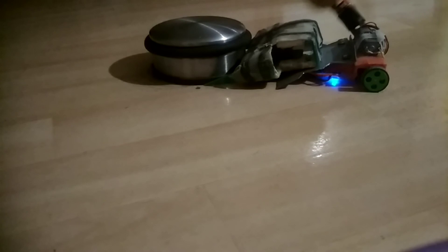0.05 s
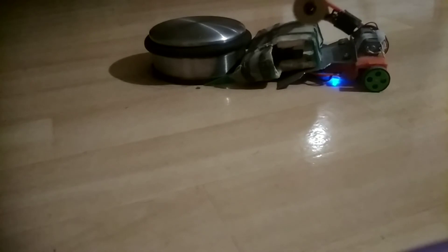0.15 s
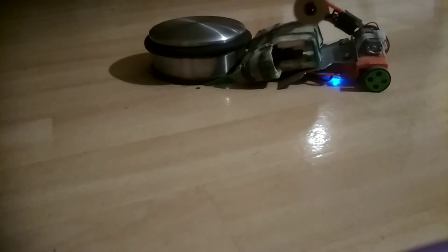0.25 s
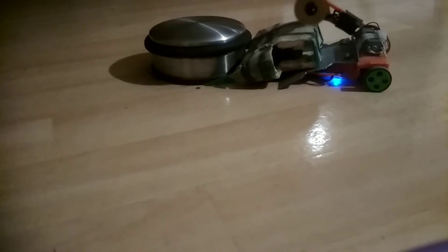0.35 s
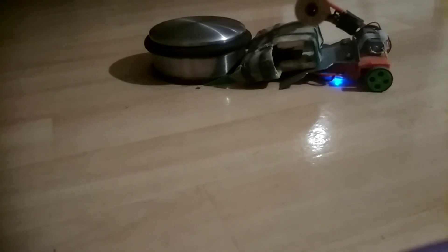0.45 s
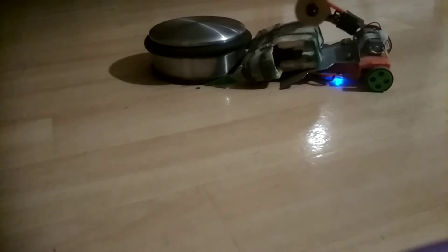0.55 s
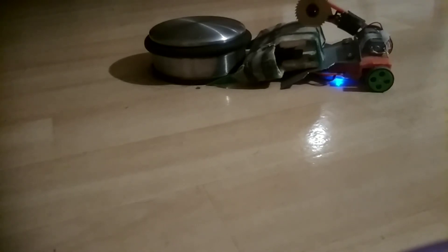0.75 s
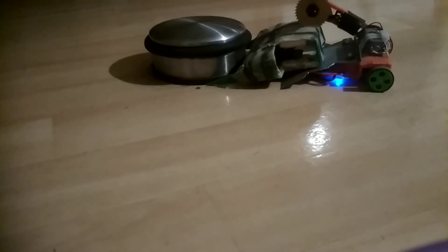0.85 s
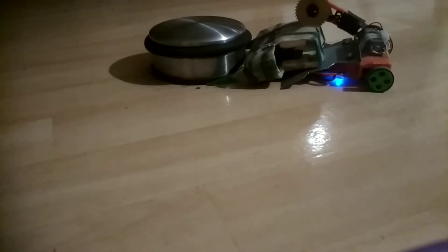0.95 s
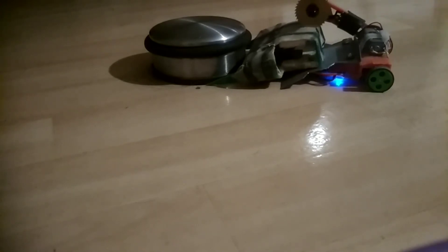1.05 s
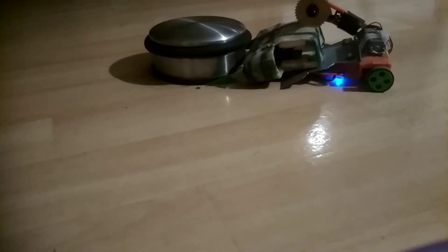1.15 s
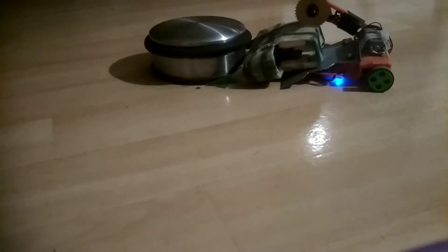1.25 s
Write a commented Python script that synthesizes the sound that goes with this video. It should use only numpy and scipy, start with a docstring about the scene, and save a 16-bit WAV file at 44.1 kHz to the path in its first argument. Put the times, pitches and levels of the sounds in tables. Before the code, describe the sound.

In a small room, a toy robot's saw rasps and bounces after a short gear whir and a sharp crack. Plastic knocks and floor thumps crowd together, the blade squeals and rings out, and a low hum and light ticks remain.

```python
"""On a wooden floor in a small room, a toy robot swings its little circular saw down.
The geared arm motor whirs, then the blade bites with a snap. Its edge rasps and bounces, knocking the
plastic chassis and thumping the floor; the knocks crowd together, then the disc binds, squeals,
rings and runs out. A low hum and a few light ticks remain until the arm motor stirs again."""
import sys
import numpy as np
from scipy import signal
from scipy.fft import rfft, irfft
from scipy.io import wavfile
from scipy.ndimage import uniform_filter1d

SR = 44100
rng = np.random.default_rng(int(sys.argv[2]) if len(sys.argv) > 2 else 0)


def wrap_up_sound(samples):
    """Save the sound to the file named by the first command line argument, as 16-bit audio."""
    columns = np.atleast_2d(samples).T
    # keep every value between -1 and 1, then stretch to whole-number steps
    tamed = np.clip(columns, -1, 1)
    steps = np.round(tamed * 32767).astype(np.int16)
    wavfile.write(sys.argv[1], SR, steps)


N = 57330

# EQ curves of the background rumble and the reverb: (frequency [Hz], gain [dB])
RUMBLE_EQ = [(25, 14), (60, 9), (150, 7), (380, 1), (600, -10), (1000, 0), (3000, -7), (4200, -26),
             (6000, -28), (15000, -35)]
REVERB_EQ = [(60, -9), (300, -8.5), (550, -10.5), (850, -5.5), (3200, 6.5), (5000, 5), (11000, -2),
             (15000, -4)]
# Glide and fade of the low hum: (time [s], pitch [Hz], level [dB])
HUM_CURVE = [(.78, 102.3, -80), (.82, 106, -38), (.87, 100.5, -38), (.92, 93.4, -47), (.96, 94.6, -69),
             (1.0, 96.7, -52.5), (1.1, 99.3, -54), (1.2, 100, -56.5), (1.3, 100, -60)]
# Resonances of the plastic body: (frequency [Hz], gain [dB], t60 [s])
CHASSIS_MODES = [(294, -55.5, 0.079), (443, -61.5, 0.14), (841, -51, 0.15), (950, -55, 0.014),
                 (1247, -53, 0.1), (1230, -73, 0.007), (1567, -49, 0.035), (2105, -59, 0.14),
                 (2090, -51, 0.045), (2162, -44.5, 0.058)]
# Ticks of the settling arm: (time [s], level [dB], pitch [Hz])
TICK_CUES = [(1.078, -34, 1410), (1.113, -28.5, 1750), (1.150, -32.5, 1280), (1.182, -38, 1100),
             (1.216, -38.5, 950)]
# Effort of the arm motor: (time [s], level [dB])
ARM_ENVELOPE = [(0, -42.5), (.035, -39), (.07, -35.5), (.11, -34), (.15, -35.5), (.175, -32), (.215, -34.5),
                (.25, -45.5), (1.0, -70), (1.15, -66), (1.245, -59.5), (1.27, -41.5), (1.3, -50.5)]
# Whine of the gear train at full effort: (frequency [Hz], level [dB])
GEAR_PARTIALS = [(290.7, -54), (360, -57), (425.3, -49), (712, -74), (1244, -62), (1287, -57)]
# Gear teeth clicking as the arm starts: (time [s], level [dB])
TOOTH_CUES = [(.003, -14), (0.01, -19), (0.0197, -22), (0.0274, -11.5), (0.034, -13), (0.044, -17),
              (0.05, -18), (1.267, -23), (1.274, -30), (1.297, -16.5)]
# EQ curves of the ticks, motor grind and gear clicks: (frequency [Hz], gain [dB])
TICK_EQ = [(200, -13), (600, -22), (850, 5.5), (1700, 0.5), (2800, -11), (4000, -23), (8000, -14),
           (15000, -20)]
ARM_EQ = [(80, -17), (140, -5.5), (200, -8), (300, 13.5), (600, 1.5), (860, 6), (1200, 9.5), (1500, -1.5),
          (3000, 2.5), (4100, -12.5), (5300, 4.5), (7000, -2), (9000, 1), (13500, 4.5), (15500, 9.5)]
TOOTH_EQ = [(300, -10.5), (1200, -10), (4000, -12.5), (9000, 1), (13500, 7), (16000, 0)]
# Scrape of the disc working free: (time [s], level [dB], centre frequency [Hz])
DISC_SWEEP = [(.69, -60, 3170), (.735, -34, 3370), (.755, -38.5, 2950), (.77, -26.5, 2120),
              (.795, -29.5, 1850), (.82, -30.5, 1920), (.84, -34, 2520), (.90, -40.5, 3370),
              (.93, -48.5, 3090), (1.0, -79, 3050), (1.06, -95, 3000)]
# Ring of the saw disc and bright modes of its edge: (frequency [Hz], gain [dB], t60 [s])
DISC_MODES = [(784, 1, 0.24), (1238, 7, .2), (1350, -19, 0.092), (1570, -12, 0.16), (1774, 10, .18),
              (1950, 5, 0.21), (1960, -18, 0.056), (2020, 0, 0.088), (2147, 7.5, 0.25), (2506, 6.5, 0.12),
              (3130, 4, 0.11), (3196, 13, 0.056), (3300, 18, 0.056), (4050, -5, .074)]
EDGE_MODES = [(3980, -29, 0.11), (5196, -32.5, 0.058), (9500, -39.5, 0.038), (10460, -39, 0.04)]
# Rasp of the blade: (time [s], level [dB])
RASP_ENVELOPE = [(.221, -85), (.226, -33), (.26, -37), (.36, -35), (.5, -36.5), (.6, -30), (.74, -32.5),
                 (.82, -31.5), (.89, -32), (.93, -46.5), (1.0, -72), (1.05, -100)]
# Fuller grind under load, riding on the rasp envelope: (time [s], level offset [dB])
LOAD_ENVELOPE = [(.22, 4), (.55, 0), (.63, -3.5), (.78, -5.5), (.82, -4.5), (.9, -52)]
# Cracks of the saw teeth catching: (time [s], level [dB], t60 [s])
SNAP_CUES = [(0.2239, 10, 0.032), (.3475, -2, 0.031), (0.386, -2, 0.014), (0.553, 0, 0.031),
             (0.59, -2.5, 0.054), (0.6455, 0, 0.033)]
# Blade bounces: (time [s], clack level [dB], thump level [dB], chatter t60 [s], clack pitch [Hz])
KNOCK_CUES = [(.225, 0, -2, 0.03, 1200), (0.2319, 4, 0, 0.066, 1390), (0.2408, -7, 4, 0.022, 1170),
              (0.2776, 3, 0, 0.11, 556), (0.2853, -4, -6, 0.0095, 1290), (0.309, -2.5, 0.5, 0.057, 820),
              (0.326, 1, -9, 0.23, 1230), (0.347, -3.5, -0.5, 0.041, 1370), (0.385, 6, -1, 0.067, 1170),
              (0.415, -0.5, -27, 0.018, 650), (0.4225, 2, -7, 0.039, 1200), (0.459, -3, 6.5, 0.042, 610),
              (0.4661, 3, 6, .036, 610), (0.4735, -7, 0.5, 0.03, 1250), (0.5057, 2, 4, 0.12, 1850),
              (0.5203, 0.5, 5.5, 0.022, 596), (.545, -6, -3.5, 0.028, 786), (.552, 0, -3.5, 0.057, 940),
              (.5911, 5, -2, 0.043, 1040), (.599, 1.5, -2.5, 0.18, 750), (0.6481, 4, 2, 0.023, 620),
              (0.6568, 1, 2.5, 0.017, 840), (0.6633, -7, -1, 0.013, 760), (0.68, -2, 2, 0.081, 766),
              (.688, -6.5, -8, 0.021, 760), (.696, -3, -9, 0.042, 770), (.703, 1, -4, 0.072, 1240),
              (0.7131, -0.5, 2, 0.036, 600), (0.7196, 3, 5, 0.017, 776), (0.7346, 4, 2.5, 0.086, 960),
              (0.7432, -1.5, -1, 0.081, 1010), (0.7534, 3.5, 5, 0.052, 564), (0.762, -0.5, 8, 0.066, 1270),
              (0.767, 5, -25, 0.015, 1860), (.777, -0.5, 4, 0.077, 1400), (0.7837, 4, 0, 0.065, 1270),
              (.793, -2, 0.5, 0.036, 1980)]
# EQ curves of the saw's layers: (frequency [Hz], gain [dB])
RASP_EQ = [(100, -42), (550, -42), (800, -8.5), (1500, -3), (2200, -9), (2750, -33), (3900, -14.5),
           (4400, -3.5), (5200, -5), (6200, -2.5), (7500, 3), (8600, -3.5), (9500, -3), (10800, 8.5),
           (12700, 2.5), (13500, -28), (15500, 2)]
LOAD_EQ = [(100, 5.5), (400, 0), (1200, 8), (2200, 2.5), (2650, -4.5), (4200, -25.5), (4700, -3.5),
           (5400, 2.5), (5900, -35), (7500, -22), (8600, 6.5), (9500, 10.5), (11000, 3), (12700, 3),
           (14000, 11), (15500, -3.5)]
SNAP_EQ = [(300, -62), (2000, 7), (4000, 8), (7000, 5), (10000, 20), (15000, 7.5)]
CLACK_EQ = [(60, -25.5), (200, -4), (400, 2), (600, -1), (800, 1.5), (1300, 4.5), (1650, -2), (2200, -2),
            (2650, -12.5), (4000, -20.5), (5200, -11.5), (7000, -30), (10000, -39), (15000, -11.5)]
THUMP_EQ = [(20, -7.5), (50, -8.5), (80, 3.5), (130, -2), (220, -5), (400, -5), (700, -17.5), (2000, -74)]

DISC_PAN_DB = 2.5
TIME = np.arange(N) / SR


def from_db(db):
    """Decibels to gain."""
    return 10 ** (np.asarray(db) / 20)


def unit_rms(x):
    """Scale to rms 1."""
    return x / np.sqrt(np.mean(x ** 2) + 1e-20)


def automation(rows):
    """The columns of a breakpoint curve at every sample."""
    times, *columns = np.transpose(rows)
    return [np.interp(TIME, times, column) for column in columns]


def pan(db):
    """Constant-power gains for a level difference; positive is left."""
    gains = from_db(np.array([[.5], [-.5]]) * db)
    return gains / np.sqrt(np.mean(gains ** 2, axis=0))


def convolve(x, response):
    """Play stereo x through an impulse response."""
    return signal.fftconvolve(x, response, axes=1)[:, :N]


def eq(x, curve):
    """Minimum-phase EQ with unit power gain."""
    size = 8192
    hz, db = np.transpose(curve)
    bin_hz = np.arange(size // 2 + 1) * SR / size
    log_gain = np.log(from_db(np.interp(np.log(bin_hz + 1), np.log(hz), db)))
    cepstrum = irfft(log_gain)[:size // 2]
    cepstrum[1:] *= 2
    response = irfft(np.exp(rfft(cepstrum, size)))
    return convolve(x, response[None] / np.linalg.norm(response))


def tail(t60):
    """Dense stereo ringing that dies away; unit energy."""
    t = np.arange(SR // 2) / SR
    ringing = rng.standard_normal((2, len(t))) * from_db(-60 * t / t60)
    return ringing / np.linalg.norm(ringing, axis=1, keepdims=True)


def rattle(x, t60, ring_db):
    """Contacts blended with the dense ringing they start, at unchanged power."""
    wet = from_db(ring_db)
    return (x + wet * convolve(x, tail(t60))) / np.hypot(1, wet)


def ring(x, hz, t60):
    """One mode: a unit click sets a sine of height 1 ringing."""
    r, w = from_db(-60 / (t60 * SR)), 2 * np.pi * hz / SR
    return signal.lfilter([0, np.sin(w)], [1, -2 * r * np.cos(w), r * r], x + 1e-18)


def resonate(x, modes):
    """A body adds its modes to whatever shakes it."""
    return x + sum(from_db(db) * ring(x, hz, t60) for hz, db, t60 in modes)


def clicks(times, db):
    """Stereo impulses at the given times."""
    out = np.zeros((2, N))
    out[:, np.clip((np.atleast_1d(times) * SR).astype(int), 0, N - 1)] = from_db(db)
    return out


def grains(per_s, spread_db):
    """Random tiny contacts of uneven size; rms 1."""
    sizes = from_db(spread_db * np.minimum(rng.exponential(1, N), 5)) * rng.choice([-1, 1], N)
    hits = rng.random(N) < per_s / SR
    return np.tile(unit_rms(sizes * hits), (2, 1))


def waver():
    """Smooth random modulation, some tens of turns a second; rms 1."""
    return unit_rms(uniform_filter1d(uniform_filter1d(rng.standard_normal(N), size=700), size=700))


def chatter(times, levels_db, t60s, contact_db=-18.5):
    """Each hit is one sharp contact in a dying flurry of smaller ones."""
    out = np.zeros((2, N + SR))
    for start, gain, t60 in zip((times * SR).astype(int), from_db(levels_db), t60s):
        out[:, start:start + SR // 2] += gain * tail(t60)
        out[:, start + 20] += gain * from_db(contact_db) * rng.choice([-1, 1])
    return out[:, :N]


def clack(time, db, t60, hz, width_hz=130):
    """One hit, coloured by the broad resonance of the spot it strikes on the chassis."""
    hit = chatter(np.array([time]), [db], [t60])
    resonance = signal.lfilter(*signal.iirpeak(hz, hz / width_hz, fs=SR), hit + 1e-18)
    return hit + from_db(-3.5) * resonance


def rumble():
    """A quiet bed of low noise that steps up when the saw bites."""
    level_db = np.where(TIME < SNAP_CUES[0][0], -88.5, -66.5)
    return from_db(level_db) * eq(rng.standard_normal((2, N)), RUMBLE_EQ)


def reverb(x):
    """The short, bright tail of a small room."""
    return from_db(-9.5) * eq(convolve(x, tail(t60=.34)), REVERB_EQ)


def hum():
    """A low, drifting sine hum, mostly on the right."""
    hz, db = automation(HUM_CURVE)
    gate = TIME > HUM_CURVE[0][0]
    tone = np.sqrt(2) * np.sin(2 * np.pi * np.cumsum(hz) / SR)
    return gate * from_db(db) * tone * pan(-13)


def ticks():
    """Light plastic ticks as the arm settles."""
    return eq(sum(clack(time, db, t60=.019, hz=hz) for time, db, hz in TICK_CUES), TICK_EQ)


def gear_whine(wobble=.004, spin_up_s=.028, flutter_db=1.5):
    """The gears start slightly flat and spin up to a fluttering whine."""
    speed = 1 + wobble * waver() - .06 * np.exp(-TIME / spin_up_s)
    travel = np.cumsum(speed) / SR
    whine = np.zeros((2, N))
    for hz, db in GEAR_PARTIALS:
        gain = from_db(db + flutter_db * waver()) * np.sqrt(2)
        cycles = hz * travel + rng.random() + rng.random((2, 1)) / 2
        whine += gain * np.sin(2 * np.pi * cycles)
    return whine


def arm_motor():
    """Whine and grind follow the motor's effort; single gear teeth click at each start."""
    effort_db, = automation(ARM_ENVELOPE)
    swing = from_db(effort_db - effort_db.max()) * (TIME < 1)  # only the full swing whines
    whine = gear_whine() * swing
    grind = eq(rattle(grains(per_s=9200, spread_db=-.5), t60=.051, ring_db=3), ARM_EQ)
    teeth = eq(rattle(clicks(*np.transpose(TOOTH_CUES)), t60=.041, ring_db=34), TOOTH_EQ)
    return whine + resonate(grind, CHASSIS_MODES) * from_db(effort_db) + teeth


def sweep_gain(hz, centre_hz, width_oct=.28, skirt_db=-26):
    """Gain of a band under the moving resonance of the scrape."""
    return from_db(skirt_db) + np.exp(-.5 * (np.log2(hz / centre_hz) / width_oct) ** 2)


def disc_scrape():
    """A scrape sinks as the disc binds, rises as it works free, and rings the modes it passes."""
    level_db, centre_hz = automation(DISC_SWEEP)
    edges_hz = np.geomspace(1100, 3500, 11)
    scrape = np.zeros((2, N))
    for low, high in zip(edges_hz, edges_hz[1:]):
        contacts = rattle(grains(per_s=4000, spread_db=-.5), t60=.0052, ring_db=3.5)
        band = signal.sosfilt(signal.butter(2, [low, high], "band", fs=SR, output="sos"), contacts)
        scrape += unit_rms(band) * sweep_gain(np.sqrt(low * high), centre_hz)
    rub = rng.standard_normal((2, N))
    ringing = sum(from_db(db) * ring(rub * np.sqrt(sweep_gain(hz, centre_hz)), hz, t60)
                  for hz, db, t60 in DISC_MODES)
    blend = from_db(-2) * unit_rms(scrape) + from_db(-.5) * unit_rms(ringing)
    return blend * from_db(level_db) * pan(DISC_PAN_DB)


def disc_squeal(peak_s=.793, rise_db_per_s=512, fall_db_per_s=406):
    """One mode of the disc swells as it binds and dies as it lets go."""
    t = TIME - peak_s
    level_db = -23.5 + np.minimum(rise_db_per_s * t, -fall_db_per_s * t)
    tone = unit_rms(ring(rng.standard_normal((2, N)), hz=1975, t60=.036))
    return tone * from_db(level_db) * pan(DISC_PAN_DB)


def disc_ring_out(release_s=.795, lowpass_hz=1420):
    """The disc springs free with a soft blow and rings on, its low modes longest."""
    soften = signal.butter(2, lowpass_hz, fs=SR, output="sos")
    strike = signal.sosfilt(soften, clicks(release_s, db=-32) + 1e-18)
    ringing = sum(from_db(db) * ring(strike, hz, t60) * rng.choice([-1, 1], (2, 1))
                  for hz, db, t60 in DISC_MODES)
    return ringing * pan(DISC_PAN_DB)


def blade_rasp():
    """The spinning edge scrapes: dense contacts ring the blade, with a fuller grind under load."""
    rasp_db, = automation(RASP_ENVELOPE)
    load_db, = automation(LOAD_ENVELOPE)
    scrape = np.zeros((2, N))
    for level_db, curve in (rasp_db, RASP_EQ), (rasp_db + load_db + 4, LOAD_EQ):
        contacts = grains(per_s=7000, spread_db=7) * from_db(level_db)
        scrape += eq(rattle(contacts, t60=.11, ring_db=11.5), curve)
    return resonate(scrape, EDGE_MODES) * pan(-2)


def blade_snaps():
    """Bright cracks as the teeth catch, the first by far the loudest."""
    return eq(chatter(*np.transpose(SNAP_CUES)), SNAP_EQ)


def blade_knocks(push_lead_s=.00093):
    """Each bounce clacks the chassis and thumps the floor: one push, then its shaking."""
    times, clack_db, thump_db, t60, hz = np.transpose(KNOCK_CUES)
    clacks = sum(clack(*cue) for cue in zip(times, clack_db, t60, hz))
    push = clicks(times - push_lead_s, thump_db - 4) * pan(-17)
    shake = chatter(times, thump_db - 6.5, t60) * pan(-4.25)
    return eq(clacks, CLACK_EQ) * pan(.5) + eq(push + shake, THUMP_EQ)


def scene():
    """The robot and its room reverb over a bed of hum and rumble."""
    body = resonate(blade_knocks() + blade_rasp() + ticks(), CHASSIS_MODES)
    robot = body + blade_snaps() + disc_scrape() + arm_motor() + disc_squeal() + disc_ring_out()
    return rumble() + hum() + reverb(robot) + robot


def record(dry, ceiling=.7, cutoff_hz=15450):
    """Soft clipping rounds the peaks and a steep low-pass trims the top."""
    lowpass = signal.ellip(12, .2, 80, cutoff_hz, fs=SR, output="sos")
    return signal.sosfilt(lowpass, ceiling * np.tanh(dry / ceiling))


dry = scene()
out = record(dry)
wrap_up_sound(out)
```